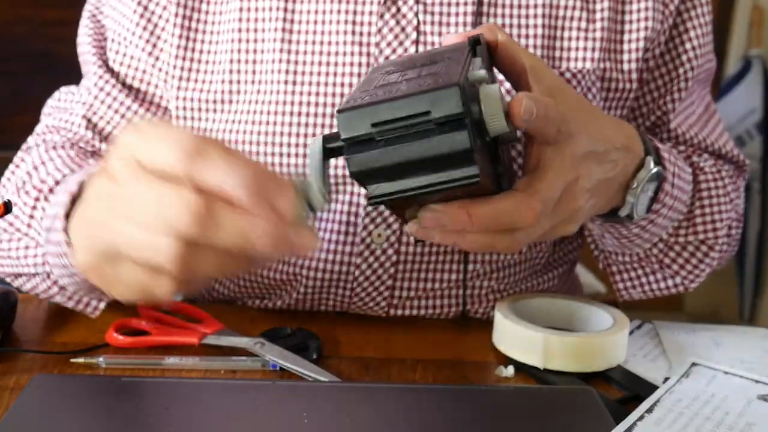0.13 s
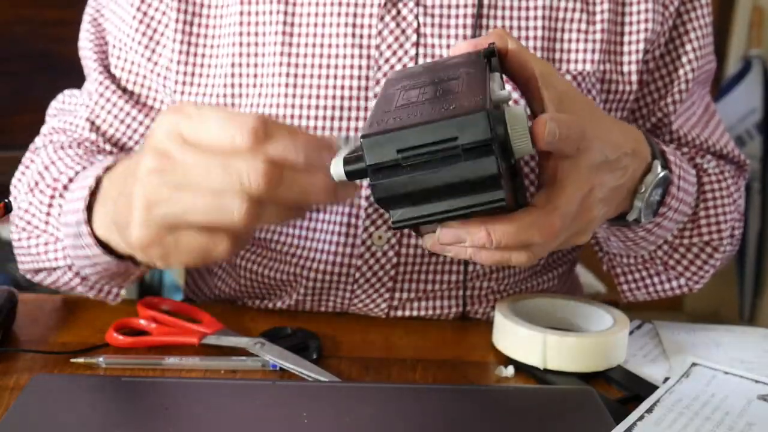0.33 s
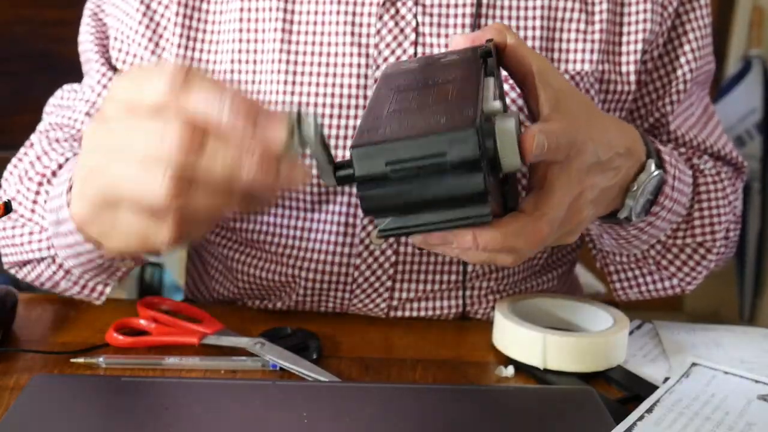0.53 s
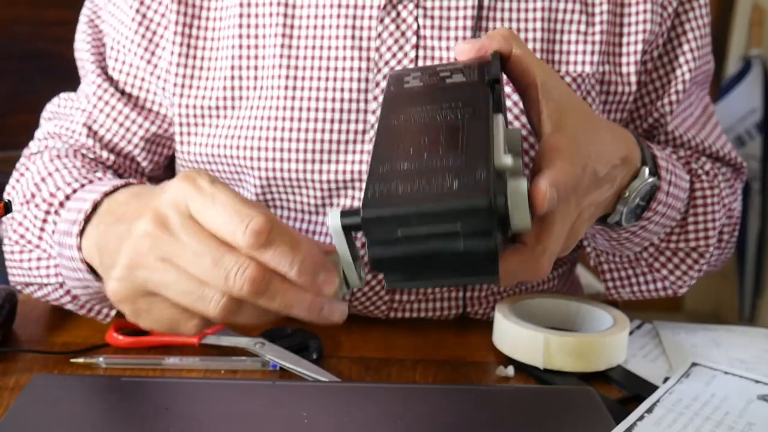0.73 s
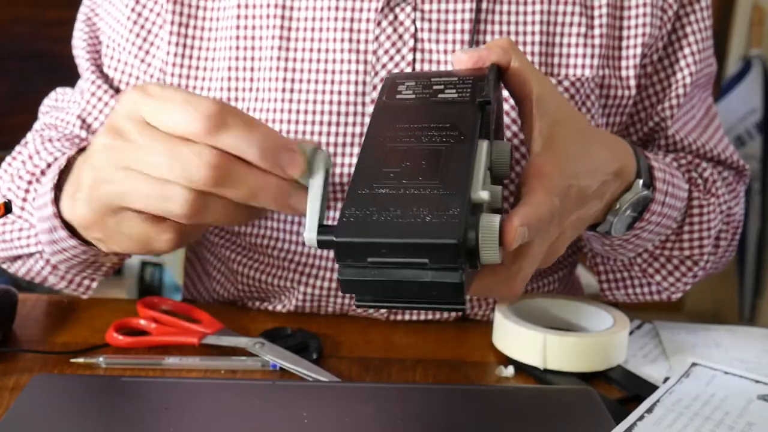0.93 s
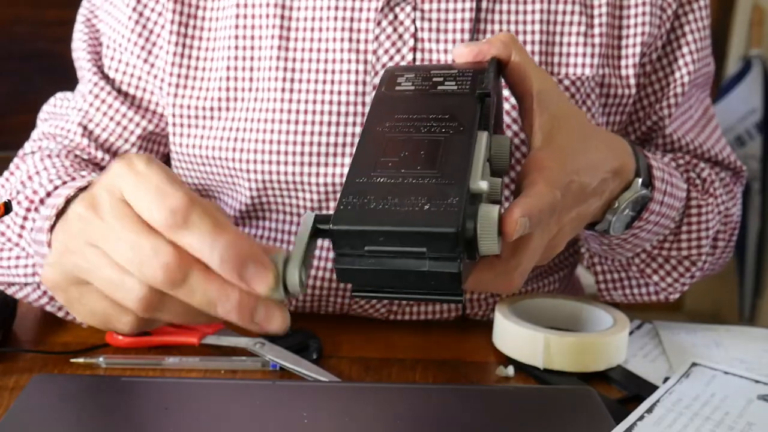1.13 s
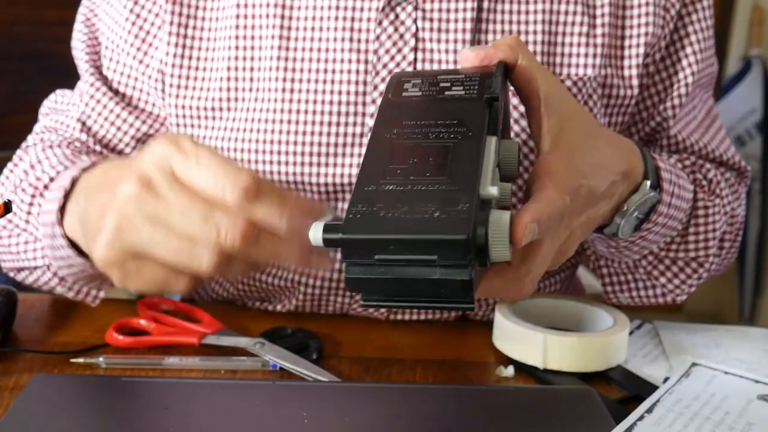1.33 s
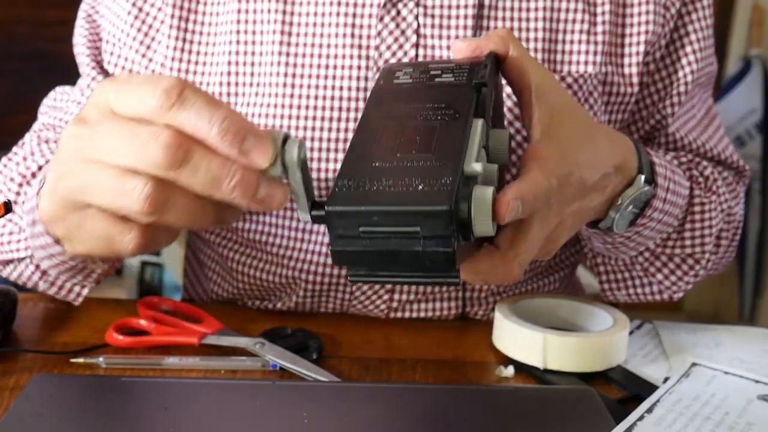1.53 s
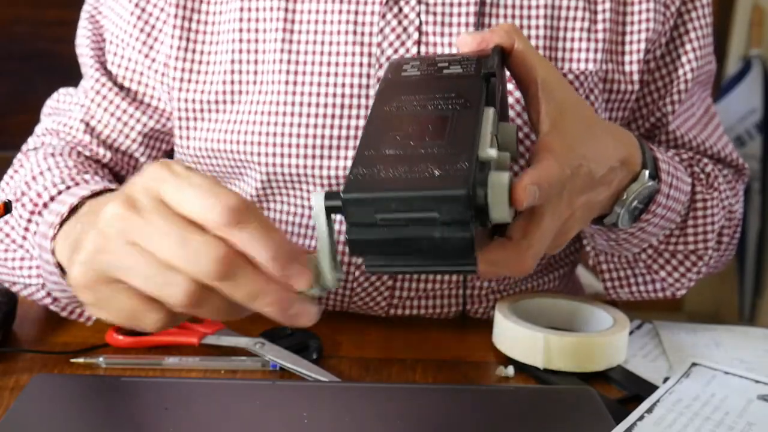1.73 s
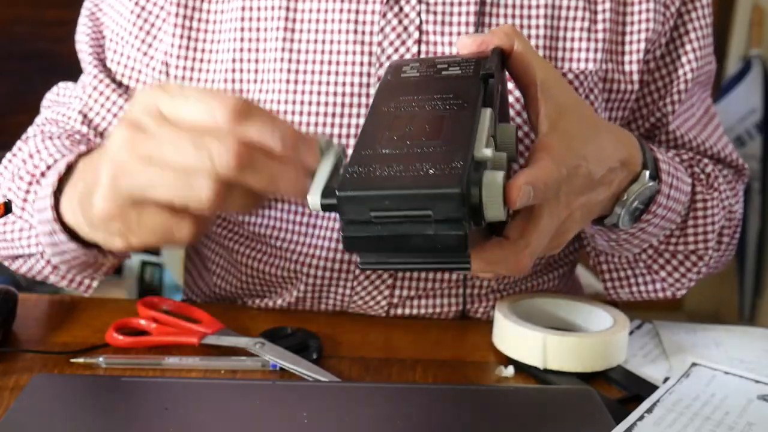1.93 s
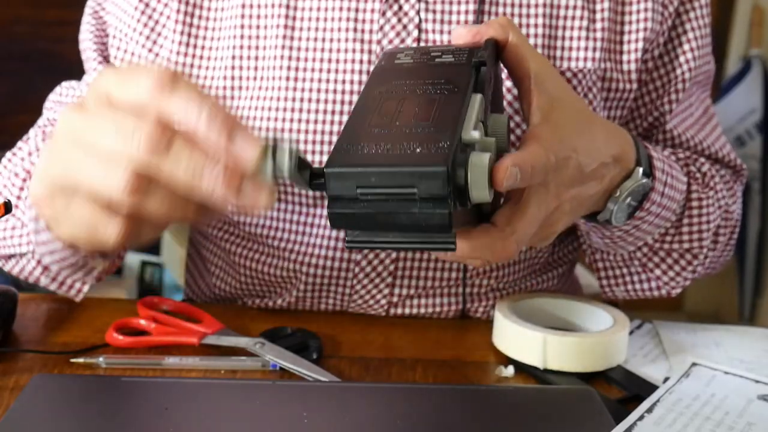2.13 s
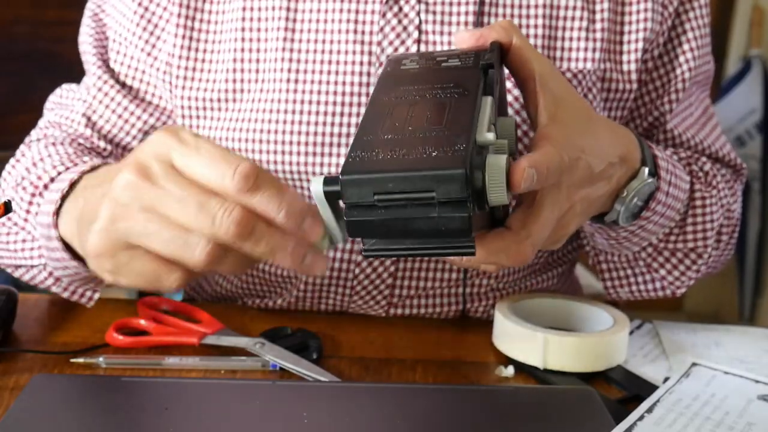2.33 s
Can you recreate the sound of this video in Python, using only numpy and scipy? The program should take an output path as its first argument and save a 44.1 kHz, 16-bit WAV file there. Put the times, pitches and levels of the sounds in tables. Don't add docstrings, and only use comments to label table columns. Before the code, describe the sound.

A hand-turned film loader clicks loudly and evenly, its sprung pawl slipping after small climbing knocks. Film and gears rub softly, fingers shift on the case; close, slightly overloaded, nearly mono, indoors over faint low hum.

```python
import sys
import numpy as np
from scipy import signal
from scipy.io import wavfile
from scipy.ndimage import uniform_filter1d

SR = 44100
rng = np.random.default_rng(int(sys.argv[2]) if len(sys.argv) > 2 else 0)


def attenuation_scalar(level_db):
    decades = np.asarray(level_db, float) / 20
    return 10 ** decades


def inscribe(sig):
    pcm = np.round(np.clip(np.atleast_2d(sig).T, -1, 1) * 32767)
    wavfile.write(sys.argv[1], SR, pcm.astype(np.int16))


N = 110250

# start in seconds, snap level in dB, low thump in dB, rebound in dB,
# pitch ratio of the case modes.
SNAPS = [
    (0.2115, 0.5, -29, -12.5, 1.013),
    (0.6138, 0.5, -46, -15, 1.015),
    (1.01, -1, -26, -7.5, 1.008),
    (1.3955, -1.5, -18.5, -8.5, 1.033),
    (1.7890, 0, -24, -11.5, 1.004),
    (2.2072, -2, -46, -15.5, 1),
]
# low modes in dB, middle modes in dB,
# upper modes in dB, top modes in dB, pawl note in dB.
GRIP_HOLDS = [
    (2, 2.5, -2, -1.5, 1),
    (2, -3.5, -1, -0.5, 0.5),
    (0.5, 6, 0, -9, 2.5),
    (0, 4, -2.5, -2, -1.5),
    (-1, 1, -1.5, -2, 2.5),
    (-0.5, 0.5, 3.5, -3, 1),
]
HOLD_HZ = [1700, 4100, 8000, 11500]
# pitch in Hz, level in dB, 60 dB decay time in seconds.
CASE_MODES = [(1400, -16, 0.046), (1678, -17, 0.038), (2277, -16, 0.016), (3326, -8, 0.011),
              (4005, -8.5, 0.024), (4602, -1.5, 0.012), (5770, 3.5, 0.0018), (6966, -3.5, 0.0078),
              (8290, -2, 0.005), (9790, 4.5, 0.0032), (11300, -1.5, 0.0063), (12150, 0.5, 0.0032),
              (14800, -33, 0.013), (14500, -20, 0.0043)]
# start in seconds, level in dB, pitch in Hz,
# length in seconds, share of case ring from 0 to 1.
CLIMBS = [(0.168, -29, 1320, 0.016, 0.5), (0.185, -24.5, 540, 0.012, 0.26), (0.188, -27, 4470, 0.0024, 0.2),
          (0.206, -24, 5000, 0.0021, 0.6), (.209, -10.5, 1450, 0.002, 0.7), (0.549, -43, 4800, 0.0044, 0.2),
          (0.561, -36, 5670, 0.0043, 0.3), (0.5661, -31, 1950, 0.0045, 0), (0.571, -37, 1360, 0.009, 0),
          (0.587, -40, 890, 0.0052, 0.3), (0.607, -17, 1440, 0.011, 0.97),
          (0.936, -41.5, 1600, 0.035, 0.07), (1.001, -24, 1310, 0.0042, 0.37),
          (1.0084, -12, 1800, 0.0017, 0.56), (1.3134, -35, 1390, 0.0051, 0),
          (1.346, -36, 4000, 0.0033, 0.33), (1.350, -24, 2390, 0.0045, 0.25), (1.353, -32, 800, 0.0033, 0),
          (1.358, -29, 3000, 0.0046, 0.5), (1.3874, -17.5, 3530, 0.0015, 0.67),
          (1.388, -21, 1620, 0.006, 0.28), (1.741, -32, 1680, 0.02, 0.16),
          (1.7552, -28.5, 1500, 0.0041, 0.5), (1.758, -34.5, 490, 0.0021, 0), (1.775, -28, 1210, 0.023, 0),
          (1.786, -32, 1440, 0.0045, 0.1), (2.164, -40, 2500, 0.0033, 0.3),
          (2.167, -27.5, 2100, 0.0071, 0.15), (2.1755, -27.5, 1880, 0.0057, 0.5),
          (2.1914, -24.5, 5000, 0.0028, 0.16), (2.195, -26.5, 1460, 0.026, 0.57)]
# start in seconds, level in dB, pitch in Hz,
# length in seconds, share of case ring from 0 to 1.
SLIPS = [(0.031, -67, 917, 0.0037, 0.8), (0.115, -46, 1110, 0.011, 0.25), (0.309, -36.5, 845, 0.0071, 0.3),
         (.462, -38, 7000, .001, .2), (.498, -38, 4000, .0015, .4), (.8345, -40, 8500, .001, 0),
         (2.050, -44, 4600, .002, 0), (0.41, -44, 574, 0.017, 0.13), (0.571, -41.5, 267, 0.024, 0),
         (0.683, -35.5, 524, 0.0205, 0.43), (0.76, -41.5, 1235, 0.011, 0.04),
         (1.246, -42.5, 290, 0.051, 0.44), (1.306, -40.5, 264, 0.06, 0.78),
         (1.539, -57.5, 495, 0.031, 0.04), (1.679, -45.5, 1330, 0.038, 0.08),
         (2.325, -44, 628, 0.014, 0.01), (2.433, -45, 830, 0.043, 0.44)]
# time in seconds, level in dB.
RUB_LEVEL = [(0.0, -57.5), (0.15, -46.5), (0.35, -59), (0.5, -51.5), (0.6, -46), (0.8, -54.5), (0.9, -52),
             (0.99, -49.5), (1.2, -60.5), (1.3, -54.5), (1.39, -48.5), (1.6, -62), (1.7, -51.5),
             (1.78, -47), (2.0, -58.5), (2.15, -49.5), (2.35, -59.5), (2.5, -56)]
# frequency in Hz, level in dB.
RUB_COLOUR = [(300, -10), (1000, 2), (3000, -14.5), (3700, -2), (5800, -3), (6500, -14.5), (14500, -16),
              (16000, -34)]
# time in seconds, level in dB.
GRIP_LEVEL = [(0.0, -54), (0.1, -56), (0.38, -47.5), (0.5, -54), (0.58, -50), (0.81, -47.5), (1.02, -61.5),
              (1.2, -61.5), (1.3, -44), (1.45, -61.5), (1.55, -52), (1.65, -59.5), (1.74, -56.5),
              (1.9, -59), (2.15, -58.5), (2.25, -55.5), (2.4, -58), (2.5, -54)]
# frequency in Hz, level in dB.
GRIP_COLOUR = [(130, -5.5), (260, 6), (350, -2), (550, 4.5), (800, -9), (1600, -32)]
# frequency in Hz, 60 dB decay time in seconds.
ROOM_DECAY = [(250, 0.075), (700, 0.17), (1700, 0.34), (4600, 0.4), (8000, 0.32), (13000, 0.3)]
# frequency in Hz, level in dB.
ROOM_COLOUR = [(300, -10.5), (1600, -6.5), (3700, -3.5), (5900, -1.5), (6600, -7), (11500, -7.5),
               (14000, -16.5), (16000, -27)]
# frequency in Hz, level in dB per Hz.
AIR_COLOUR = [(110, 1), (160, -30), (270, -15.5), (480, -5.5), (900, -10.5), (2600, -14), (14000, -25),
              (16000, -51)]
# time in seconds, pitch in Hz, level in dB.
ENGINE_HUM = [(0.0, 93, -45.5), (0.1, 95.8, -58), (0.21, 88, -66), (0.22, 89, -60), (0.31, 90.6, -63),
              (0.45, 82.6, -49), (0.55, 93.1, -54.5), (0.88, 92.7, -46.5), (1.37, 88.6, -48.5),
              (1.43, 88.6, -69), (1.52, 93.9, -56), (1.7, 89.75, -52.5), (1.78, 90.23, -56),
              (2.0, 89, -62.5), (2.04, 88.7, -63), (2.2, 84.8, -45), (2.23, 85.6, -64), (2.5, 84.5, -75)]
# time in seconds, pitch in Hz, level in dB.
ENGINE_THROB = [(0.0, 46.3, -39), (0.05, 46.5, -33.5), (0.12, 45.2, -50.5), (0.18, 44.9, -30.5),
                (0.25, 42, -45), (0.32, 45.2, -39.5), (0.39, 47.9, -51), (0.47, 49, -38.5),
                (0.54, 46.4, -55), (0.57, 47, -41), (0.77, 48.1, -44), (0.82, 47.96, -37),
                (1.24, 44.2, -48.5), (1.32, 47.9, -50), (1.42, 42.47, -54.5), (2.0, 41.94, -40),
                (2.1, 41.65, -54), (2.5, 37.6, -47.5)]
# frequency in Hz, side relative to mid in dB.
SIDE_COLOUR = [(40, -31), (90, -62), (180, -29), (350, -27.5), (1500, -25), (4000, -29), (10000, -14.5),
               (14000, -12)]

HIT_N = 2048
HIT_T = np.arange(HIT_N) / SR
T = np.arange(N) / SR
CHATTER_S, CHATTER_PER_S = 0.0019, 3700
REBOUND_S, LATE_S, LATE_DB = 0.003, 0.011, -26
PAWL_HZ, PAWL_DB, PAWL_RISE_S, PAWL_T60_S = 5567, 0, 0.0012, 0.074
CRACK_HZ, CRACK_DB, CRACK_LOW_HZ = 3600, 10, 570
THUMP_HZ, THUMP_WIDTH_HZ = 400, 450
KNOCK_Q, KNOCK_TOP_HZ = 0.8, 5560
RUMBLE_DB, RUMBLE_HZ = -51.5, 41
AIR_DB, ROOM_DB, SLIP_ROOM_DB = -55, -10, -10.5
OPEN_SHARE, TAIL_SHARE, TAIL_S = 0.55, 0.25, 0.13
SHUT_DB, QUIET_SIDE_DB = -45, 21.5
EDGE_HZ = 15650


def snap(db, thump_db, rebound_db, shift, hold_db):
    def landing():
        first = chatter(CHATTER_S)
        rebound = np.roll(chatter(CHATTER_S * 1.16), round(REBOUND_S * SR))
        late = np.roll(chatter(CHATTER_S), round(LATE_S * SR))
        return first + attenuation_scalar(rebound_db) * rebound + attenuation_scalar(LATE_DB) * late

    body = ring(shift, landing, hold_db[:-1])
    pawl = pawl_note(shift, hold_db[-1])
    crack = resonate(chatter(CHATTER_S), CRACK_HZ, CRACK_HZ)
    blow = 0.7 * body + pawl + attenuation_scalar(CRACK_DB) * crack
    blow = np.clip(attenuation_scalar(db) * blow, -1.1, 1.1)
    blow = signal.filtfilt(*signal.butter(2, CRACK_LOW_HZ, "high", fs=SR), blow)
    thump = np.sin(2 * np.pi * THUMP_HZ * HIT_T) * np.exp(-np.pi * THUMP_WIDTH_HZ * HIT_T)
    return blow + 2 * attenuation_scalar(thump_db) * thump


def chatter(length):
    chance, force = rng.random((HIT_N, 2)).T
    contacts = (0.26 + (chance < CHATTER_PER_S / SR)) * (2 * force - 1)
    u = HIT_T / length
    hits = contacts * u * np.exp(-np.e * u ** 2)
    return hits / np.linalg.norm(hits)


def ring(shift, strike, hold_db=(0, 0, 0, 0)):
    out = np.zeros(HIT_N)
    luck = rng.standard_normal((len(CASE_MODES), 2))
    for (hz, db, t60), (level_luck, pitch_luck) in zip(CASE_MODES, luck):
        pitch = hz * shift * (1 + 0.035 * pitch_luck)
        mode = attenuation_scalar(-60 * HIT_T / t60) * np.sin(2 * np.pi * pitch * HIT_T)
        rung = signal.fftconvolve(strike(), mode)[:HIT_N]
        rung *= np.linalg.norm(mode) / np.linalg.norm(rung)
        out += attenuation_scalar(db + 0.87 * level_luck + np.interp(hz, HOLD_HZ, hold_db)) * rung
    return out


def pawl_note(shift, hold_db):
    u = HIT_T / PAWL_RISE_S
    burst = u ** 2 * np.exp(1 - u ** 2)
    tail = 0.053 * np.minimum(u, 1) * attenuation_scalar(-60 * HIT_T / PAWL_T60_S)
    note = np.sin(2 * np.pi * (PAWL_HZ * shift * HIT_T + rng.random()))
    return attenuation_scalar(PAWL_DB + hold_db) * (burst + tail) * note


def knock(db, hz, length, share):
    hits = chatter(length)
    dull = resonate(resonate(hits, hz, hz / KNOCK_Q), hz, hz / KNOCK_Q)
    dull = signal.lfilter(*signal.butter(2, min(2.57 * hz, 7500), fs=SR), dull)
    case = ring(1.02, lambda: chatter(length), hold_db=(-0.5, -7, -9, 13))
    bright = signal.lfilter(*signal.butter(4, KNOCK_TOP_HZ, fs=SR), case + hits)
    blend = (1 - share) * dull / abs(dull).max() + share * bright / abs(bright).max()
    return 2 * attenuation_scalar(db) * blend


def rub():
    grain = attenuation_scalar(0.37 * evened(uniform_filter1d(rng.standard_normal(N), size=300)))
    return follow(RUB_LEVEL) * noise(RUB_COLOUR, patchy_db=3.5) * grain


def grip():
    return follow(GRIP_LEVEL) * noise(GRIP_COLOUR, patchy_db=5.0)


def room(x):
    taps = rng.standard_normal(SR // 2)
    taps[:200] = 0
    hz, t, z = signal.stft(taps, SR, nperseg=256)
    uneven = uniform_filter1d(rng.standard_normal(z.shape), size=3, axis=0)
    uneven = evened(uniform_filter1d(uneven, size=14, axis=1))
    decay_db = -60 * t / read(ROOM_DECAY, hz)[:, None]
    db = read(ROOM_COLOUR, hz)[:, None] + decay_db + 3.04 * uneven
    tail = signal.istft(z * attenuation_scalar(db), SR, nperseg=256)[1]
    return signal.fftconvolve(x, tail / np.linalg.norm(tail))[:N]


def engine():
    rumble = resonate(resonate(rng.standard_normal(N), RUMBLE_HZ, 33), RUMBLE_HZ, 33)
    lumps = attenuation_scalar(1.04 * evened(resonate(rng.standard_normal(N), 13.0, 8.4)))
    waver = attenuation_scalar(0.8 * evened(resonate(rng.standard_normal(N), 4.5, 9.5)))
    return waver * tone(ENGINE_HUM) + lumps * tone(ENGINE_THROB) + attenuation_scalar(RUMBLE_DB) * evened(rumble)


def tone(points):
    s, hz, db = np.transpose(points)
    phase = 2 * np.pi * np.cumsum(np.interp(T, s, hz)) / SR
    return np.sqrt(2) * attenuation_scalar(np.interp(T, s, db)) * np.sin(phase)


def air():
    return attenuation_scalar(AIR_DB) * noise(AIR_COLOUR, patchy_db=-0.5)


def spread(mid):
    hz, t, z = signal.stft(mid, SR, nperseg=512)
    starts = np.array(SNAPS)[:, 0]
    latest = np.maximum(np.searchsorted(starts - 0.012, t) - 1, 0)
    since = t - starts[latest]
    near_snap = (since > -0.012) & (since < TAIL_S)
    share = np.where(near_snap, np.where(since < 0.012, 1, TAIL_SHARE), OPEN_SHARE)
    luck = rng.random((len(t) // 4 + 1, 41))
    luck = 0.7 * luck[:, :1] + 0.3 * luck
    band = 1 + (5 * np.log(1 + hz / 100)).astype(int)
    luck = luck[np.arange(len(t)) // 4][:, band].T
    gate_db = SHUT_DB / (1 + np.exp(30 * (share - luck)))
    side_db = read(SIDE_COLOUR, hz)[:, None] - 12.0 + QUIET_SIDE_DB * (share < 1) + gate_db
    scramble = np.exp(2j * np.pi * rng.random(z.shape[::-1]).T)
    return signal.istft(z * scramble * attenuation_scalar(side_db), nperseg=512)[1][:N]


def noise(colour, patchy_db):
    hz = np.fft.rfftfreq(1024, 1 / SR)
    real, imag, patches = rng.standard_normal((N // 256 + 5, 513, 3)).T
    patches = uniform_filter1d(patches, size=10, axis=0)
    patches = evened(uniform_filter1d(patches, size=12, axis=1))
    gain = attenuation_scalar(read(colour, hz)[:, None] + patchy_db * patches) * (hz > 100)[:, None]
    return evened(signal.istft((real + 1j * imag) * gain, nperseg=1024, noverlap=768)[1][:N])


def resonate(x, hz, width_hz):
    turn = np.exp(2j * np.pi * hz * np.arange(len(x)) / SR)
    r = np.exp(-np.pi * width_hz / SR)
    return 2 * (turn * signal.lfilter([1 - r], [1, -r], x / turn)).real


def follow(points):
    return attenuation_scalar(np.interp(T, *np.transpose(points)))


def read(points, hz):
    f, value = np.transpose(points)
    return np.interp(np.log(hz + 1), np.log(f + 1), value)


def evened(x):
    return x / np.sqrt(np.mean(x ** 2) + 1e-20)


def add(mix, s, sound):
    part = mix[round(s * SR):][:len(sound)]
    part += sound[:len(part)]


def scene():
    mid = rub() + grip() + air() + engine()
    for (start, db, *rest), hold_db in zip(SNAPS, GRIP_HOLDS):
        add(mid, start, snap(db, *rest, hold_db))
        tick = np.zeros(N)
        tick[round(start * SR)] = 4 * attenuation_scalar(db)
        mid += attenuation_scalar(ROOM_DB) * room(tick)
    knocks = np.zeros(N)
    for start, *settings in CLIMBS + SLIPS:
        add(knocks, start, knock(*settings))
    mid += knocks + attenuation_scalar(SLIP_ROOM_DB) * room(knocks)
    side = spread(np.clip(mid, -1, 1))
    return np.array([mid + side, mid - side])


def top_cut(x):
    return signal.sosfilt(signal.butter(12, 16390, fs=SR, output="sos"), x)


def record(dry):
    edge = signal.firwin(255, EDGE_HZ, fs=SR)[None]
    cut = signal.oaconvolve(np.clip(dry, -1, 1), edge, "same")
    return top_cut(np.clip(cut, -1, 1))


dry = scene()
out = record(dry)
inscribe(out)
```